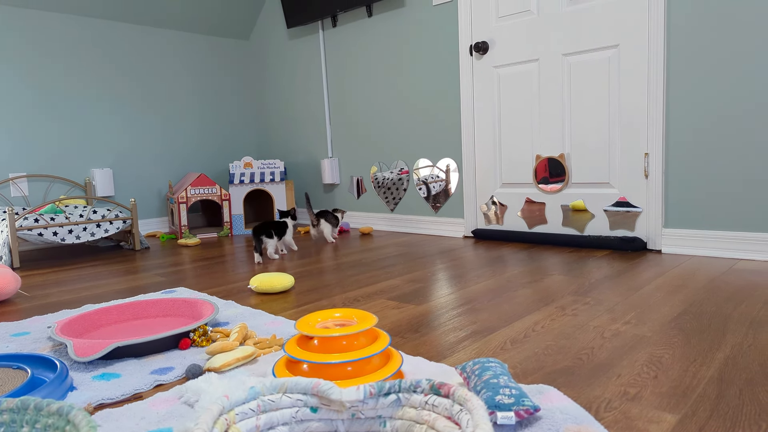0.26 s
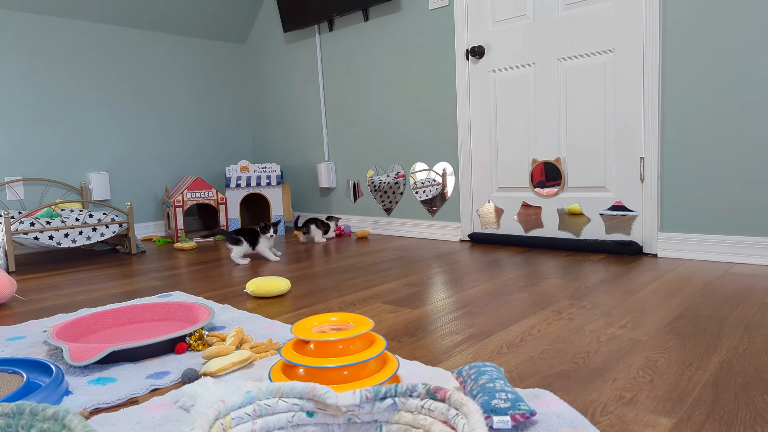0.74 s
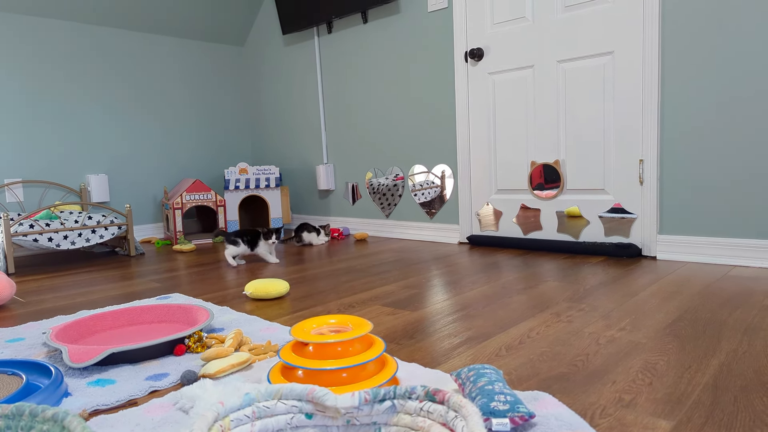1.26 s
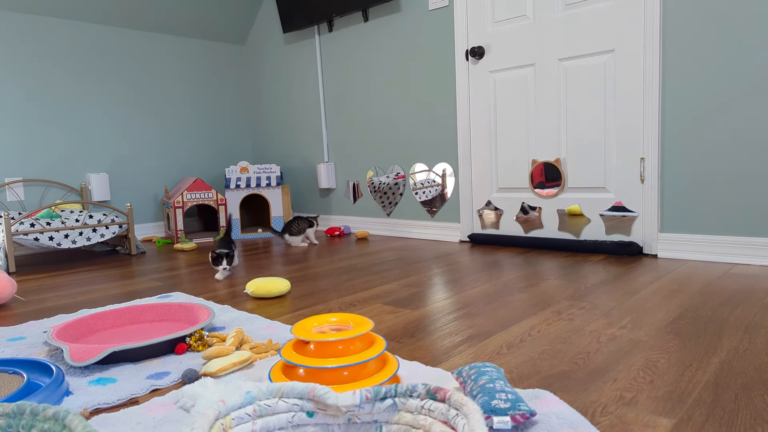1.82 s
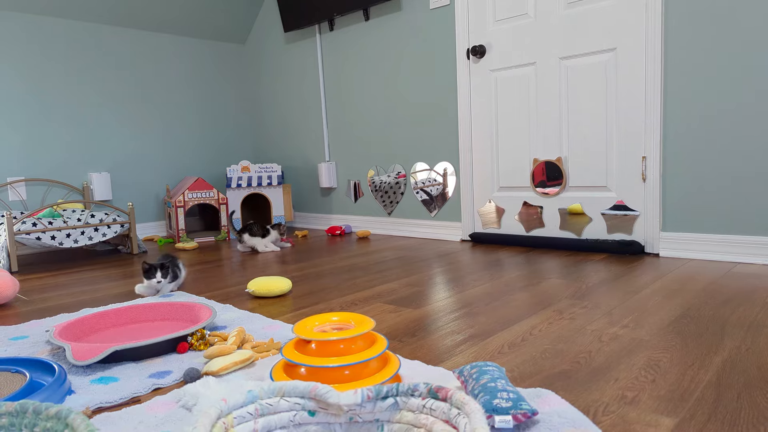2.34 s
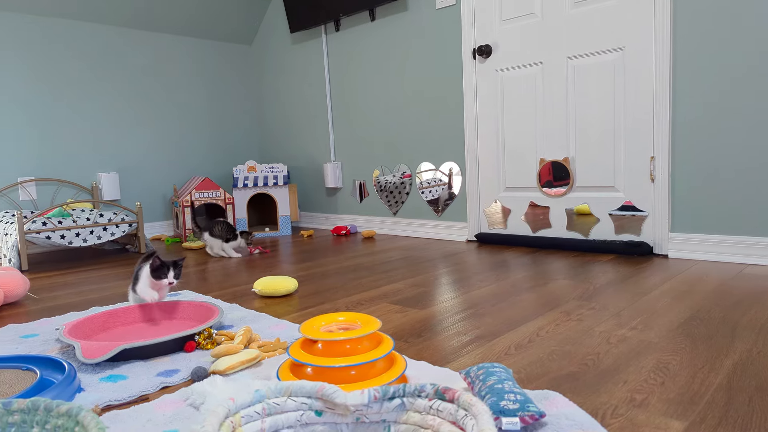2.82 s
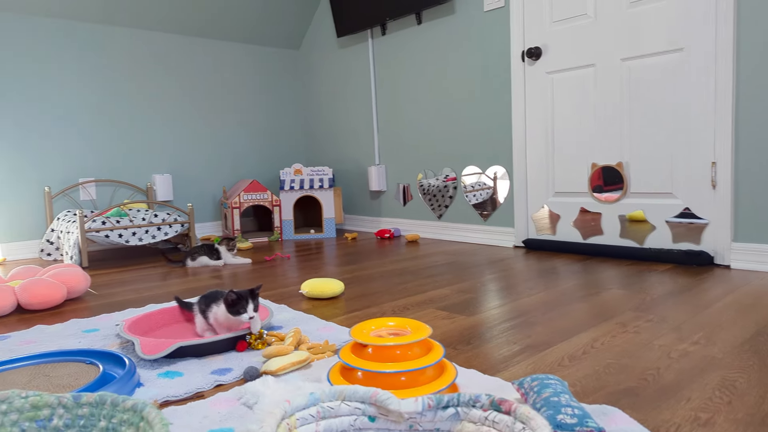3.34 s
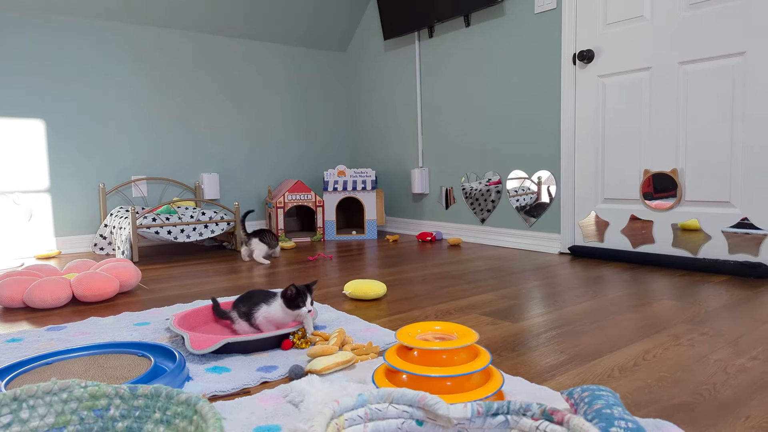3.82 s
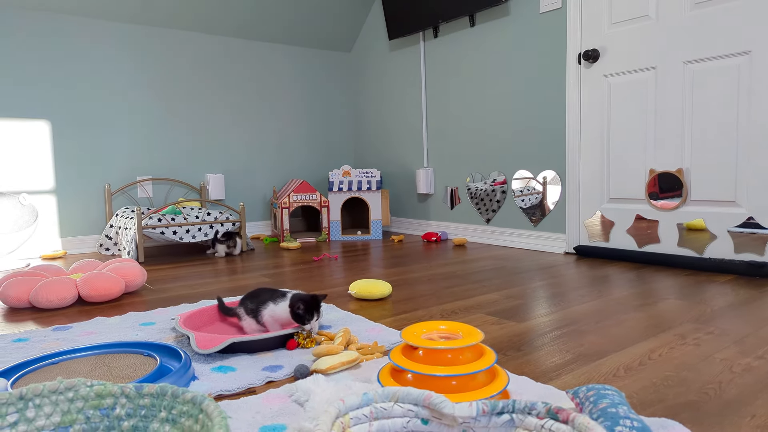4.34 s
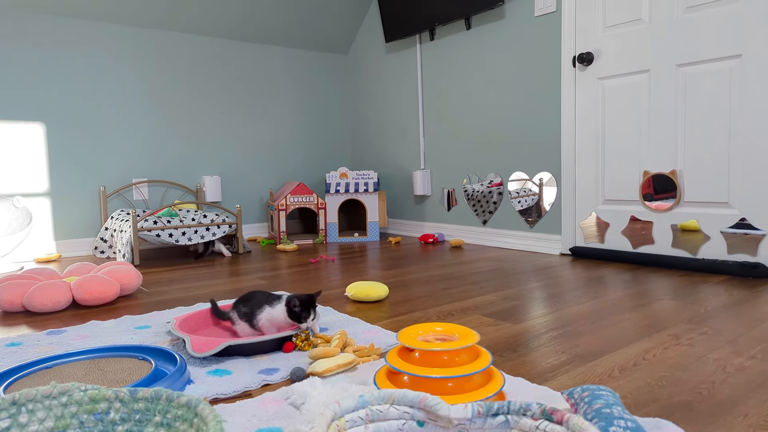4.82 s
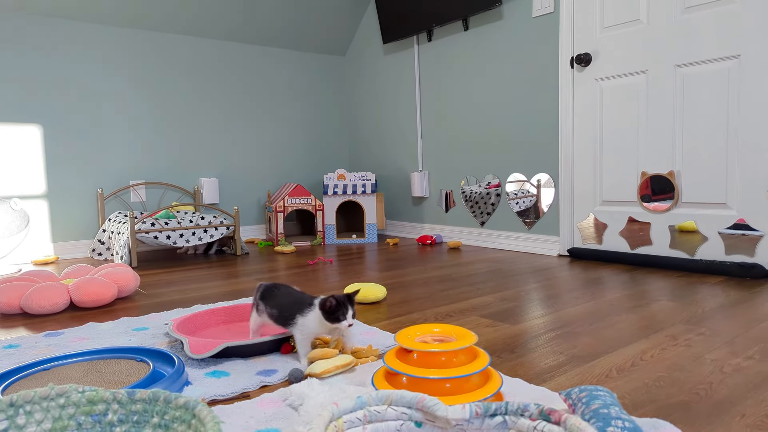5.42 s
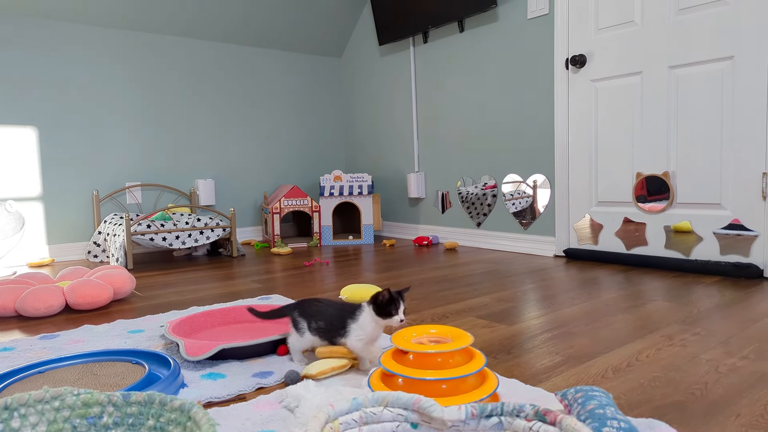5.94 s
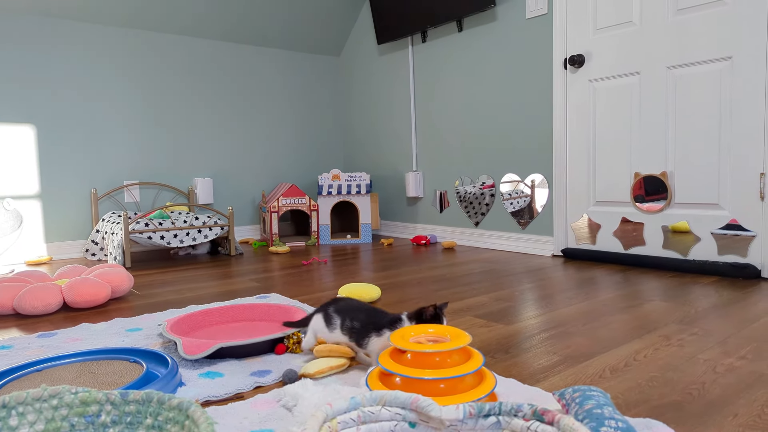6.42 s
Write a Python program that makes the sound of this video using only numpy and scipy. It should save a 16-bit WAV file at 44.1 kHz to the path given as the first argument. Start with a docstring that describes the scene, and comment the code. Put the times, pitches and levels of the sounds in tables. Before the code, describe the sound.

Two kittens play on a hardwood floor in a quiet, bare room. Sharp little claw clicks come densely at first, then thin out. Two soft low thumps land after two seconds, then a scraping skid booms through the boards. Lighter pattering and scuffing returns, ending with a faint thump. A fixed stereo microphone catches short room echoes, ventilation rumble and faint mains hum.

```python
"""Kittens patter and scuffle across the wooden floor of a quiet, bare room, heard at two spaced ports.
Dense claw ticks (ringing noise cracks) open it and thin out over paw scuffs (bands of random grains).
Low thumps of decaying floor modes fall at 2.0 and 2.4 s, the later one with a sudden surge of rumble.
A long skid with a gliding ring booms at 3.5 s; from 4.1 s the patter returns, left, then right, to a last thump.
Walls of fading noise answer the paws; ventilation noise and a mains hum fill the bass throughout."""
import sys
import numpy as np
from scipy import signal
from scipy.fft import rfft, irfft, next_fast_len
from scipy.io import wavfile

SR = 44100
rng = np.random.default_rng(int(sys.argv[2]) if len(sys.argv) > 2 else 0)


def transcribe(u):
    """Save the signal u as a 16-bit wav file named by the first command-line argument.

    u: samples, shape (n,) or (channels, n), limited to [-1, 1]; the rate is SR.
    q: integer samples, one column per channel.
    """
    v = np.clip(np.atleast_2d(u).T, -1, 1)
    q = np.round(v * 32767).astype(np.int16)
    wavfile.write(sys.argv[1], SR, q)


N = 294147

# Claw ticks and a few short echoes of them, levels before trim, ring and board colour: start_s,
# level_db (peak at 4-9 kHz), low_db (1.2-4 kHz above that), high_db (9-16 kHz above that), ring_hz
CLAW_TICKS = [(0.0234, -41, -4, -7, 11970.0), (0.0288, -37.5, -0.5, 9, 2040), (0.108, -36, -26, 0, 5800),
              (0.1103, -43, -20, -1, 12960.0), (0.1305, -45.5, 8.5, 8, 2250), (0.1395, -28.5, -11, 3, 7260),
              (0.1515, -47, -1, -1, 11500), (0.2443, -52, -4, -1.0, 9350.0),
              (0.2533, -41.5, 12, 15.5, 2300), (0.2577, -31.5, -5, 0, 11020.0),
              (0.2598, -36.5, -2, 5, 14000), (0.3728, -51, -11.0, -2, 6720.0),
              (0.3879, -55, 12, 13.5, 7650), (0.4339, -42.5, -5, -7, 11100), (0.4464, -47.5, 1.5, 10, 2140),
              (0.6319, -41, 6, 2, 1890), (0.7318, -53.5, -2, -1.0, 4820.0), (0.8336, -55, 0, -2, 10590.0),
              (0.8391, -53, 7, 8, 11410.0), (0.847, -54, 1, 5, 4500), (0.8534, -53, -11, 25, 5210.0),
              (0.8606, -45, 0, 6, 9000), (0.8712, -30, -11, 2.5, 11700), (0.873, -36.5, -11, -7, 6660),
              (0.901, -46, -4, -3, 4400), (0.9234, -51, -6, 17, 6370.0), (0.9285, -47, -10, 9, 3490.0),
              (0.938, -57, -14, 13, 10250.0), (1.0148, -43, -8, 2.5, 7920.0),
              (1.0242, -32, -4.5, 9.5, 13700), (1.038, -48, -10, 3, 13500), (1.1494, -46, -7, 5, 8100),
              (1.1525, -54, -14, 5, 11370.0), (1.2156, -52, 3, 7, 8310.0), (1.2256, -35.5, -10, -3, 8040),
              (1.2688, -49, -21, 8, 6630), (1.348, -59, -21, -1, 8400.0), (1.4383, -60.5, -1, 12, 10600),
              (1.538, -49.5, -23.0, 6.5, 8500), (1.592, -43, -12, 0.5, 4130), (1.7744, -37.5, -8, 0, 10900),
              (1.831, -47.5, 1.5, 6, 3930), (1.8788, -42, -9, -9, 4700), (1.9068, -55, 5, 2, 12270.0),
              (1.9245, -46, -6, 6, 9400), (2.008, -37.5, -6, -1, 8000), (2.0296, -42.5, -3, -11, 9300),
              (2.0852, -59, -8, -3.0, 3850), (2.095, -51, 1, -12, 12450.0), (2.1561, -50, -3, 4, 8050.0),
              (2.1871, -44.5, 3.5, 10.5, 7900), (2.23, -49.5, -12, -5, 7540.0),
              (2.469, -53, -11, -16, 6420.0), (2.817, -44, -13, -33, 5050), (2.853, -62, -10, -7, 7000),
              (2.889, -58, 0, -5, 5000), (2.906, -60, -10, -3, 8800), (2.934, -58.5, 5, 9, 14500),
              (2.991, -54.5, -8, -5, 6800), (3.512, -56.5, 22, -8.0, 1900), (3.517, -57, 17, -8, 1700),
              (4.1446, -60, 1, -9.0, 6290.0), (4.223, -50, 0, -4, 11840.0), (4.2323, -44, -28, -7, 6940),
              (4.3146, -52.5, -18.0, 4, 11670.0), (4.4068, -54, -5, 6, 10340.0),
              (4.5365, -48, -4, -9, 5860.0), (4.5762, -50, -7, -3.0, 5860.0),
              (4.631, -49.5, -32.0, 4, 5240), (4.6673, -51, -10, -10, 7920.0),
              (4.7004, -54, -32.0, 9, 6550), (4.7286, -51, -9, -13, 6630.0), (4.761, -64, -17, 2, 6630),
              (4.7787, -38.5, -16, -2, 6400), (5.1142, -55.5, 5, 10, 8000), (5.122, -51, 1, 4, 8400),
              (5.149, -57.5, 9, 16, 8900), (5.1576, -50, -5, 4.0, 3300), (5.1921, -39, -9.5, 2.5, 2240),
              (5.2283, -46, -10, -17, 8300), (5.2971, -55, -12, -7, 8140.0), (5.3327, -56, -7, 4, 7900),
              (5.3535, -57.5, 7.5, 13.5, 8960.0), (5.617, -50, -9, 4.0, 6500),
              (6.007, -49.5, 1.5, 7, 10500), (6.0478, -46, -26.0, 6, 11000), (6.0833, -53, -8, 11, 10000),
              (6.268, -54, -10, 6, 3740), (6.4344, -43, -12, -10, 7970.0)]
# Middle, low and high range of a contact: low_hz, high_hz
CONTACT_BANDS_HZ = [(4000, 9000), (1200, 4000), (9000, 17000)]
# Which port the claws are louder at: time_s, left_minus_right_db
CLAW_LEAN = [(0, -4.5), (1.3, -4.5), (1.5, -4.5), (2.2, -4.5), (3.5, -2), (4.2, 15), (4.5, 10), (5.2, 15),
             (5.9, -15)]
# A nearer claw excites the room less for the same loudness: time_s, room_share_db
CLAW_DISTANCE = [(0, -0.5), (0.9, 1), (1.03, -2.5), (1.2, 1), (1.6, 7.5), (2.1, -1), (4.2, 4.5),
                 (4.78, 12.5), (5.2, 10.5), (6.1, -16)]
CRACK_RISE_S, CRACK_T60_S = 0.0003, 0.0036
CLAW_LOW_HZ = 1420   # lower edge of a tick
KNOCK_BAND_HZ, KNOCK_DB = (574, 1180), -8   # dull knock, dB against the low band
CLAW_RING_DB, CLAW_SHARPNESS = 10, 14.6
FAR_RING_DB = 3   # the ring beams at the ports; this lift is left of it at the walls


def ticks():
    """A claw strikes a crack of about a millisecond that rings, with a duller knock of the board under it."""
    length, out = 400, np.zeros((3, N))
    t = np.arange(length) / SR
    envelope = np.clip(t / CRACK_RISE_S, 0, 1) * from_db(-60 * t / CRACK_T60_S)
    cracks = rng.standard_normal((len(CLAW_TICKS), length)) * envelope
    middle_hz, low_hz, high_hz = CONTACT_BANDS_HZ
    parts = []
    for edges in (middle_hz, (CLAW_LOW_HZ, low_hz[1]), high_hz, KNOCK_BAND_HZ):
        part = band(cracks, *edges)
        parts.append(part / np.abs(part).max(axis=1, keepdims=True))
    for mid, low, high, knock, (s, db, low_db, high_db, hz) in zip(*parts, CLAW_TICKS):
        body = (low - from_db(KNOCK_DB) * knock) * from_db(low_db)   # the signs join the bands without a notch
        crack = from_db(db - 2.0) * (body + high * from_db(high_db) - mid)
        near = with_ring(crack, hz, CLAW_RING_DB, CLAW_SHARPNESS)
        far = with_ring(crack, hz, FAR_RING_DB, CLAW_SHARPNESS)
        pan_db = np.interp(s, *np.transpose(CLAW_LEAN))
        room_db = np.interp(s, *np.transpose(CLAW_DISTANCE))
        add(out, near, near, far, s, pan_db, room_db)
    return out


# Paws and fur scuffing, before ring and board colour: start_s, nominal_length_s, level_db (4-9 kHz),
# low_db (1.2-4 kHz above that), high_db (9-16 kHz above that), ring_hz
PAW_SCUFFS = [(0, 0.027, -59.5, -1, -4, 11800), (0.023, 0.021, -57, 4, -3, 11900),
              (0.092, 0.093, -64.5, -3, 0, 2350), (0.24, 0.021, -55, 7, 6, 2250),
              (0.256, 0.084, -63.5, -2.5, -1, 1460), (0.623, 0.065, -68, 1.5, 0, 1430),
              (0.773, 0.054, -71.5, -4.5, -2, 2820), (0.838, 0.047, -55.5, -2.5, -19, 11200),
              (0.866, 0.009, -48, -12.5, -3, 10400), (0.873, 0.065, -61, -7, -9.5, 4400),
              (1.018, 0.033, -60, 0, -16, 3250), (1.142, 0.023, -62, -1, -8, 11800),
              (1.585, 0.081, -76.5, 9, -7, 2500), (1.77, 0.022, -80, -3, 10, 4130),
              (1.989, 0.062, -65.5, 3.5, 0, 7700), (2.08, 0.011, -66, -4, -2, 7000),
              (2.181, 0.017, -70, 8.5, -20, 8000), (2.66, 0.011, -73, 1, -23, 1700),
              (2.886, 0.071, -68.5, -2, -2, 1840), (3.88, 0.037, -82, 8, 1, 2800),
              (4.142, 0.11, -73.5, -7, 8, 7300), (4.357, 0.084, -68, -0.5, 6, 6600),
              (4.436, 0.085, -64, -5, -4.5, 2170), (4.514, 0.054, -61, -8.5, 0, 6100),
              (4.648, 0.037, -65.5, -8, -9, 1610), (4.77, 0.17, -72.5, 1, -11, 12200),
              (5.082, 0.18, -89, 7, 17, 8250), (5.234, 0.16, -73, -4, 3, 8400),
              (5.475, 0.075, -68, 1, -2.5, 12200), (5.547, 0.13, -64.5, -7, -3.5, 11800),
              (5.653, 0.094, -82, -8, -1, 12000), (5.933, 0.056, -64, -25, -7, 3050),
              (5.996, 0.032, -62, -2, -10, 2780), (6.038, 0.023, -63, 6.5, 2, 10600),
              (6.071, 0.045, -55, -9.5, 2, 3500), (6.215, 0.02, -75.5, 7, 1, 6600),
              (6.251, 0.063, -59, 0.5, -1, 3750), (6.295, 0.038, -58.5, -5.5, 3.5, 2500),
              (6.326, 0.033, -57.5, -17, -8, 4040), (6.421, 0.04, -58.5, -3.5, -0.5, 2680),
              (6.557, 0.021, -61.5, -5, 3, 2700)]


def scuffs(bands):
    """A paw lands fast, drags unevenly and lifts: rubbing noise under a rise and a longer fall."""
    out = np.zeros((3, N))
    for s, length, db, low_db, high_db, hz in PAW_SCUFFS:
        t = np.arange(int(1.218 * max(length, .005) * SR)) / SR
        landing = np.clip(t / (0.0016 + 0.15 * length), 0, 1)
        lifting = np.clip((t[-1] - t) / (0.63 * length + 0.00054), 0, 1)
        gain = landing * lifting * from_db(db)
        add(out, *rub(bands, max(s, 0), gain, low_db, high_db, hz, ring_db=12.0))
    return out


# One long skid, before ring and board colour: time_s, level_db (4-9 kHz), low_db (1.2-4 kHz above that),
# boards_db (shaking boards, above level_db), ring_hz
LONG_SKID = [(3.481, -101, 15, 0, 2000), (3.507, -66.5, 14, -1, 2000), (3.529, -48, 5, -23, 2100),
             (3.574, -41.5, 0, -14.5, 2950), (3.6, -46.5, 2.5, -11, 2700), (3.62, -49, 3.5, -10.5, 2300),
             (3.638, -43, -1, -6.5, 1790), (3.66, -46, -3, -6.5, 2500), (3.689, -50, 0.5, -15, 2660),
             (3.73, -59, -1, -6.5, 2620), (3.8, -76.5, -6, 2, 2600)]
SKID_TOP_DB = -1.5   # 9-16 kHz, dB above the level
SKID_DEEP_DB = -6.5   # deeper boom of the boards, dB above their shaking
SKID_RING_DB, SKID_SHARPNESS = 2.5, 3.6


def skid(bands):
    """The sliding body rubs in jerks with a gliding ring and also shakes the boards in a lower range."""
    out = np.zeros((3, N))
    before = (LONG_SKID[0][0] - .02, -130, 0, 0, 2000)
    after = (LONG_SKID[-1][0] + 0.12, -130, 0, 0, 2000)
    skid_db, low_db, boards_db, hz = in_time([before, *LONG_SKID, after])
    gain = from_db(skid_db + 1.5 * drift(120))
    add(out, *rub(bands, 0, gain, low_db, SKID_TOP_DB, 6500, ring_db=5))
    shaking = rms_one(band(friction(5000, uneven_db=1.0), 670, 1200)) * from_db(skid_db + boards_db)
    boom = rms_one(band(friction(1400, uneven_db=2.0), 250, 470))
    boom = boom * from_db(skid_db + boards_db + SKID_DEEP_DB)
    return gliding_ring(out, hz) + shaking + boom


def gliding_ring(x, hz):
    """Lifts a resonance whose pitch moves, block by block."""
    ring, state = np.zeros_like(x), np.zeros((len(x), 2))
    for i in range(0, N, 256):
        b, a = signal.iirpeak(hz[i], max(SKID_SHARPNESS, 1), fs=SR)
        ring[:, i:i + 256], state = signal.lfilter(b, a, x[:, i:i + 256], zi=state)
    return x + (from_db(SKID_RING_DB) - 1) * ring


# Faint rustle between the steps, before its unevenness and colour: time_s, level_db (4-9 kHz)
FUR_RUSTLE = [(0, -90), (1.36, -76), (1.47, -71), (1.65, -74.5), (1.9, -86), (2.15, -77), (2.5, -100),
              (3.22, -85), (4.07, -80.5), (4.15, -68), (4.3, -73), (4.9, -97), (5.0, -80), (5.1, -66.5),
              (5.45, -75), (5.76, -76.5), (5.97, -72.5), (6.67, -71)]
RUSTLE_LOW_DB, RUSTLE_TOP_DB, RUSTLE_HZ = 0, -8.5, 8400   # 1.2-4 and 9-16 kHz above the level, ring


def rustle(bands):
    """Fur and cloth shift faintly and unevenly: rubbing noise on a slow level curve."""
    out, uneven_db = np.zeros((3, N)), 3 * drift(14)
    gain = from_db(in_time(FUR_RUSTLE)[0] + uneven_db)
    add(out, *rub(bands, 0, gain, RUSTLE_LOW_DB, RUSTLE_TOP_DB, RUSTLE_HZ, ring_db=-3.0))
    return out


RUB_SIDE_DB, RUB_SIDE_SHARE = 1, 0.1   # wide contacts lean less: offset dB, share of the claws' lean


def rub(bands, s, gain, low_db, high_db, hz, ring_db):
    """One rubbing contact from time s on, with its level, colour and ring, ready for add()."""
    start = round(s * SR)
    mid, low, high = bands[:, :, start:start + len(gain)]
    grains = (low * from_db(low_db) + high * from_db(high_db) - mid) * gain
    sound = with_ring(grains, hz, boost_db=ring_db, sharpness=9.9)
    pan_db = RUB_SIDE_DB + RUB_SIDE_SHARE * np.interp(s, *np.transpose(CLAW_LEAN))
    return (*sound, sound[1], s, pan_db, 0)


def rubbing(spread, patchy_db, jerky_db, per_s):
    """Friction in three bands that flicker apart; a wide contact gives the ports partly different grains."""
    crackle = from_db(-9.5) * crinkle(900, sharpness=5.2)
    right = friction(per_s, uneven_db=3.0)
    own_left = friction(per_s, uneven_db=-2.5)
    left = np.sqrt(max(1 - spread, 0)) * right + np.sqrt(min(spread, 1)) * own_left
    grains = (np.array([left, right]) + crackle) * from_db(1.13 * drift(26))
    bands = []
    for edges in CONTACT_BANDS_HZ:
        flicker = from_db(jerky_db * drift(49))
        bands.append(rms_one(patchy(grains, *edges, patchy_db) * flicker))
    return np.array(bands)


def friction(per_s, uneven_db):
    """Surfaces catch in random grains of uneven size and either sign, clumped in time."""
    sizes = from_db(uneven_db * np.minimum(rng.exponential(1, N), 5)) * rng.choice([-1, 1], N)
    chance = per_s * from_db(4 * drift(60)) / SR
    return rms_one(sizes * (rng.random(N) < chance))


def crinkle(per_s, sharpness):
    """Fibres and claw tips catch one by one; each rings briefly at one of 14 pitches."""
    clicks = friction(per_s, uneven_db=5.5) + 1e-18
    dealt = rng.integers(0, 14, N)
    total = 0
    for k, hz in enumerate(np.geomspace(1500, 14000, num=14)):
        ring = signal.lfilter(*signal.iirpeak(hz, sharpness, fs=SR), clicks * (dealt == k))
        total = total + rms_one(ring) * 1.164 ** k   # stronger with pitch
    return rms_one(total)


PATCHES = 5   # narrow parts per band


def patchy(x, low_hz, high_hz, patchy_db):
    """A band whose narrow parts swell and sink on their own."""
    edges = np.geomspace(low_hz, high_hz, PATCHES + 1)
    parts = [band(x, edges[k], edges[k + 1]) * from_db(patchy_db * drift(20.3)) for k in range(PATCHES)]
    return sum((-1) ** k * part for k, part in enumerate(parts))


# Low thumps: soft landings, and the floor booming under the skid at 3.56 and 3.62 s:
# start_s, level_db (nominal, before the mode levels)
LOW_THUMPS = [(2.016, -37), (2.396, -40), (3.559, -61), (3.618, -47), (6.456, -48.5)]
# Low resonances of the floor, before random spread: mode_hz, level_db, t60_s
FLOOR_RESONANCES = [(101, 4.5, 0.098), (160, 5, 0.12), (223, 4.5, 0.063), (276, -3, 0.099),
                    (383, -9, 0.038)]


def thumps():
    """A soft push sets the low floor modes ringing, their strengths differing at each thump."""
    out, t = np.zeros(N), np.arange(int(.4 * SR)) / SR
    spreads_db = rng.normal(0, 2.5, (len(LOW_THUMPS), len(FLOOR_RESONANCES)))
    flutter = from_db(1.8 * drift(43))   # random flutter roughens the thump
    flutter = np.append(flutter, np.ones(len(t)))
    soft_onset = 1 - np.exp(-t / 0.0091)
    for (s, db), spread_db in zip(LOW_THUMPS, spreads_db):
        ring = 0
        for (hz, mode_db, t60), extra_db in zip(FLOOR_RESONANCES, spread_db):
            ring = ring + np.sin(2 * np.pi * hz * t) * from_db(db + mode_db + extra_db - 60 * t / t60)
        at = round(s * SR)
        out[at:at + len(t)] += (ring * flutter[at:at + len(t)] * soft_onset)[:N - at]
    return out


# Colour of a claw on wood, as peaks and dips: centre_hz, width_hz, gain_db
BOARD_COLOUR = [(2500, 820, 0.5), (4500, 180, -4), (6500, 2200, -1.5), (6600, 91, 3.5), (8040, 380, 1),
                (12200, 2600, 2), (16600, 1200, -14)]


def on_boards(x):
    """The wooden boards colour every contact with broad and narrow resonances."""
    size = next_fast_len(N + 999)
    return irfft(rfft(x, size) * humps(BOARD_COLOUR, np.fft.rfftfreq(size, 1 / SR)), size)[:, :N]


# Where the active kitten is: time_s, left_port_delay_samples
KITTEN_BEARING = [(0, 20), (3.9, 20), (4.2, 8), (5.0, -5), (5.4, -5), (5.5, 20), (6.67, 20)]


def add(out, left, right, to_walls, s, pan_db, room_db):
    """Adds a sound at both ports, the left shifted by its bearing, and in a third row on its way to the walls."""
    lag = round(np.interp(s, *np.transpose(KITTEN_BEARING)))
    routes = (0, left, lag, pan_db / 2), (1, right, 0, -pan_db / 2), (2, to_walls, 0, room_db)
    for row, sound, late, db in routes:
        at = max(round(s * SR) + late, 0)
        out[row, at:at + len(sound)] += (sound * from_db(db))[:N - at]


# Decay of the room: band_hz, t60_s
ROOM_DECAY = [(500, 0.24), (2000, 0.33), (6000, 0.23), (14000, 0.19)]
EARLY_S, EARLY_DB, EARLY_PER_S = 0.0035, -6, 450   # floor and furniture: delay, dB against walls, echoes per s


def room(x, wet_db, gap_s):
    """Sparse early echoes, then the walls answer: noise whose bands decay at their own rates."""
    size = int(.6 * SR)
    t, spectra = np.arange(size) / SR, port_noise(size, 0)
    hz = np.fft.rfftfreq(size, 1 / SR)
    edges, tail = 200 * 2. ** np.arange(0, 7, .4), 0
    for low, high in zip(edges, edges[1:]):
        keep = (hz >= low) & (hz < high)
        t60 = at_hz(ROOM_DECAY, np.sqrt(low * high))
        tail = tail + irfft(spectra * keep, size) * from_db(-60 * t / t60)
    slot = 22   # samples, half a millisecond
    share = np.clip(EARLY_PER_S * slot / SR, .02, 1)   # of slots that hold an echo
    filled = rng.random((2, size // slot + 1)) < share
    echoes = np.repeat(filled, slot, axis=1)[:, :size] / np.sqrt(share)
    walls = np.clip((t - gap_s) / 0.0069, 0, 1)
    early = (1 - walls) * (t > EARLY_S) * echoes * from_db(EARLY_DB)
    return from_db(wet_db) * signal.fftconvolve(x[None], tail * (walls + early), axes=1)[:, :N]


# Ventilation spectrum, relative before levelling: band_hz, density_db (per Hz)
AIR_SPECTRUM = [(15, -65), (30, -24.5), (59, -5), (102, 0), (141, -3), (225, -14), (290, -23), (405, -16.5),
                (489, -26), (677, -21), (796, -24), (936, -20), (4250, -44), (6740, -47), (11900, -59.5),
                (16000, -65)]
# The rumble below about 190 Hz rises and falls, before drift and side balance: time_s, level_db
RUMBLE_LEVEL = [(0.0, -53.5), (0.09, -53), (2.35, -52.5), (2.39, -44.5), (2.72, -54), (5.38, -50),
                (5.97, -56), (6.55, -47.5)]
# Duct resonances: centre_hz, width_hz, gain_db
DUCT_RESONANCES = [(77.4, 34.5, 10.5), (376.7, 6.6, 5.5)]
AIR_DB = -62.5   # the air above about 190 Hz
HUM_HZ, HUM_DB = 119.6, -61.0


def ventilation():
    """Coloured air noise and a hum; the left-leaning bass rises and falls, surging at the second thump."""
    size = next_fast_len(N)
    hz = np.fft.rfftfreq(size, 1 / SR) + 1
    air = port_noise(size, 0.41) * from_db(at_hz(AIR_SPECTRUM, hz)) * humps(DUCT_RESONANCES, hz)
    low_share = 1 / (1 + (hz / 190) ** 4)
    rumble_db, = in_time(RUMBLE_LEVEL)
    rumble = rms_one(irfft(air * low_share, size)[:, :N]) * from_db(rumble_db + 1.3 * drift(4))
    hiss = rms_one(irfft(air * (1 - low_share), size)[:, :N]) * from_db(AIR_DB + 0.8 * drift(1.43))
    hum_level = np.sqrt(2) * from_db(HUM_DB + 1.2 * drift(9.8))
    hum = hum_level * np.sin(2 * np.pi * HUM_HZ * np.arange(N) / SR)
    return hiss + (rumble + hum) * from_db([[.5], [-.5]])


PORT_LAG = 20   # samples that sound needs from one port to the other


def port_noise(size, from_right):
    """Spectra of noise at both ports: a share arrives from the right, the rest from all around."""
    cycles = np.fft.rfftfreq(size) * PORT_LAG
    share = np.clip(from_right, 0, 1)
    alike = share * np.exp(2j * np.pi * cycles) + (1 - share) * .97 * np.sinc(2 * cycles)
    a, b = rfft(rng.standard_normal((2, size)))
    return np.array([a, alike * a + np.sqrt(1 - np.abs(alike) ** 2) * b])


def with_ring(x, hz, boost_db, sharpness):
    """Lifts or lowers one resonance of the struck or rubbed surface."""
    b, a = signal.iirpeak(min(hz, 15000), max(sharpness, 1), fs=SR)
    return x + (from_db(boost_db) - 1) * signal.lfilter(b, a, x)


def humps(modes, hz):
    """Gain of a chain of resonance peaks and dips."""
    return from_db(sum(db / (1 + (2 * (hz - f) / width) ** 2) for f, width, db in modes))


def drift(rate_hz):
    """Slow chance with spread 1: noise through two equal low-pass poles, made at every 40th sample."""
    r = np.exp(-80 * np.pi * rate_hz / SR)
    noise = rng.standard_normal(N // 40 + 2002)
    slow = signal.lfilter([1], [1, -2 * r, r * r], noise)[2000:]
    return np.interp(np.arange(N) / 40, np.arange(len(slow)), rms_one(slow))


def band(x, low_hz, high_hz):
    """Keeps one frequency band."""
    return signal.sosfilt(signal.butter(2, [low_hz, high_hz], "band", fs=SR, output="sos"), x)


def in_time(rows):
    """Draws each column of a timed table as a curve over the whole scene."""
    s, *columns = np.transpose(rows)
    return [np.interp(np.arange(N) / SR, s, c) for c in columns]


def at_hz(points, hz):
    """Reads a curve at given frequencies, straight on a log frequency axis."""
    return np.interp(np.log(hz), np.log(np.array(points)[:, 0]), np.array(points)[:, 1])


def from_db(db):
    """Turns decibels into an amplitude factor."""
    return 10 ** (np.asarray(db) / 20)


def rms_one(x):
    """Scales a signal to an RMS of 1."""
    return x / np.sqrt(np.mean(x ** 2) + 1e-20)


def scene():
    """Paws on the boards with their room, over the thumps and the ventilation."""
    bands = rubbing(spread=0.94, patchy_db=3.0, jerky_db=2.0, per_s=3000)
    skid_bands = rubbing(spread=0.94, patchy_db=1.5, jerky_db=-0.4, per_s=9000)
    paws = on_boards(ticks() + scuffs(bands) + skid(skid_bands) + rustle(bands))
    return paws[:2] + room(paws[2], wet_db=-30.5, gap_s=0.008) + thumps() + ventilation()


def record(dry):
    """Cuts the top steeply: 70 dB down from 16.5 kHz up."""
    return signal.sosfilt(signal.cheby2(14, 70, 16500, fs=SR, output="sos"), dry)


dry = scene()
out = record(dry)
transcribe(out)
```